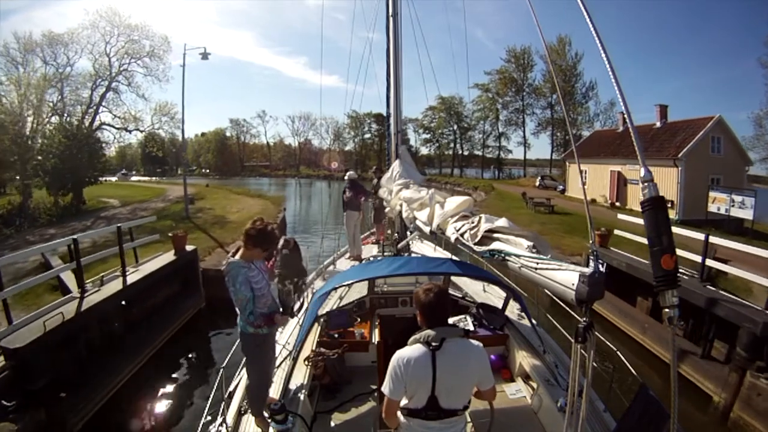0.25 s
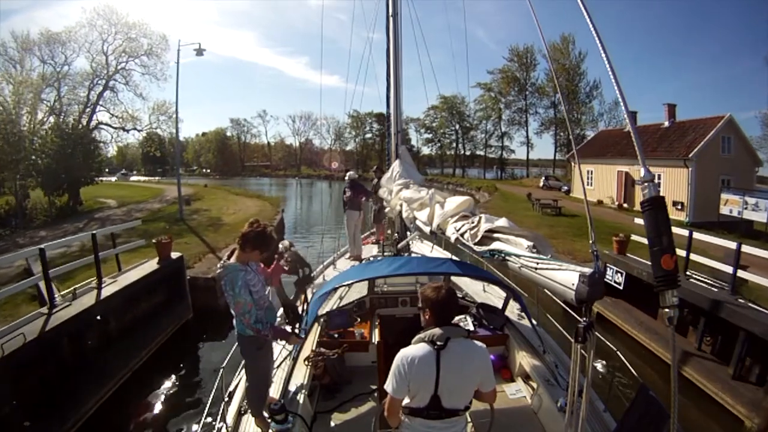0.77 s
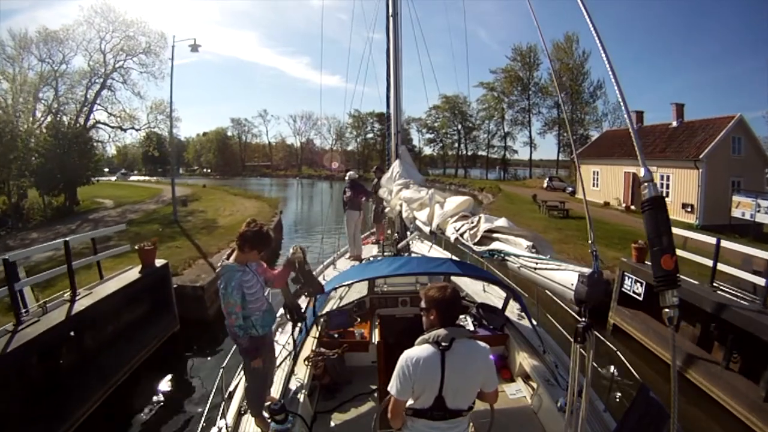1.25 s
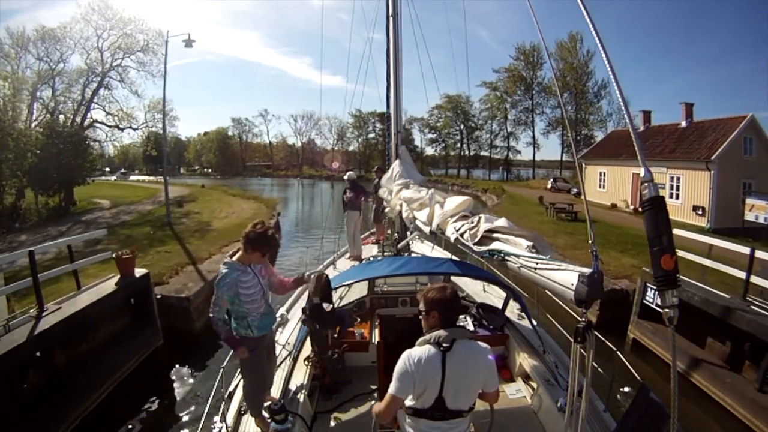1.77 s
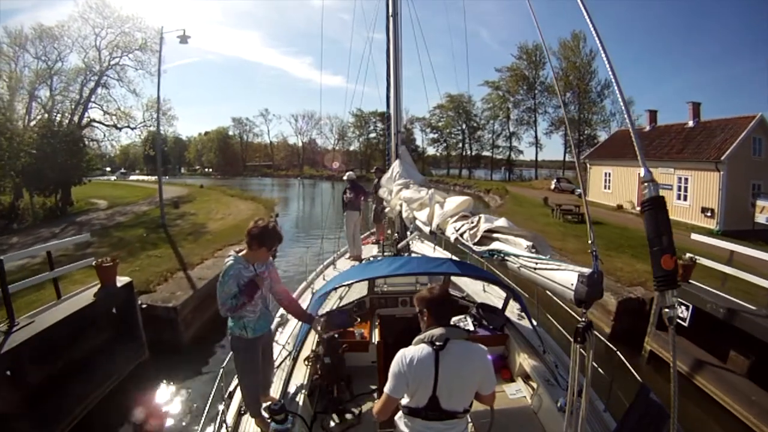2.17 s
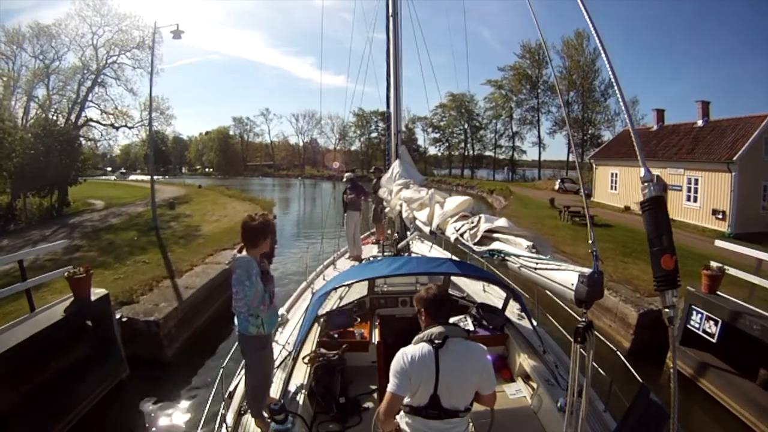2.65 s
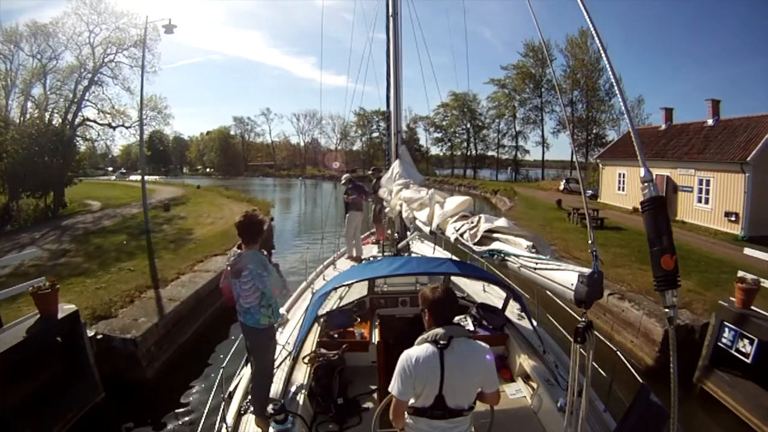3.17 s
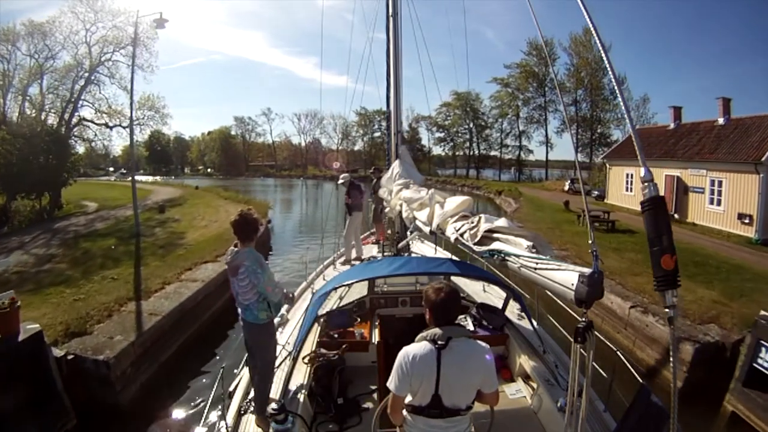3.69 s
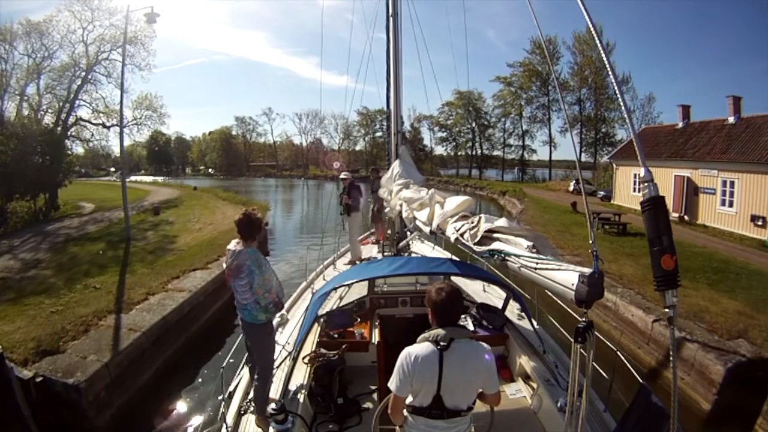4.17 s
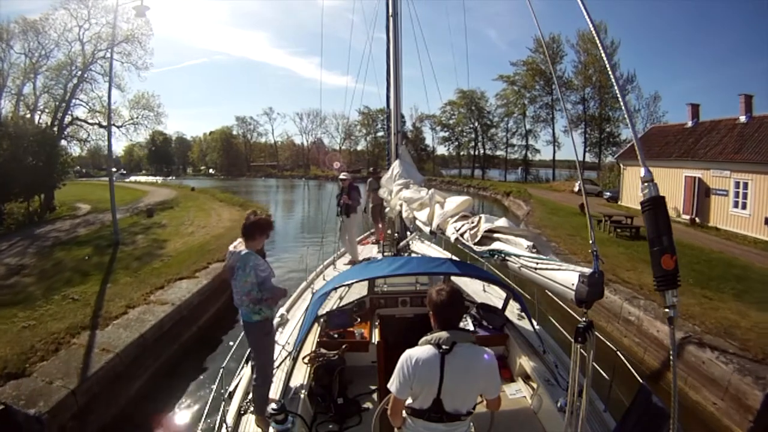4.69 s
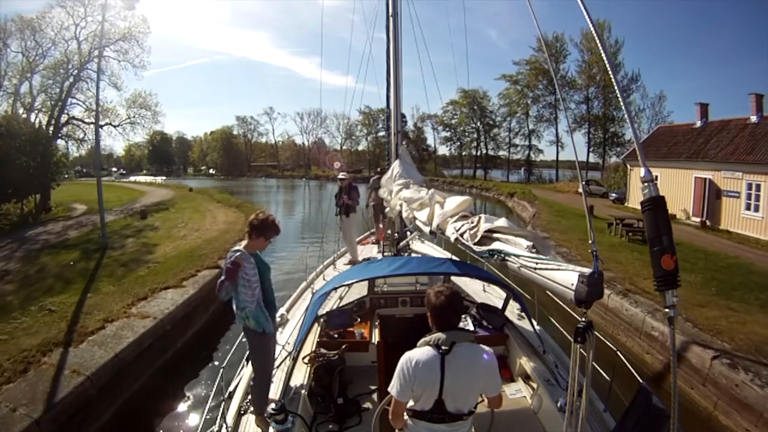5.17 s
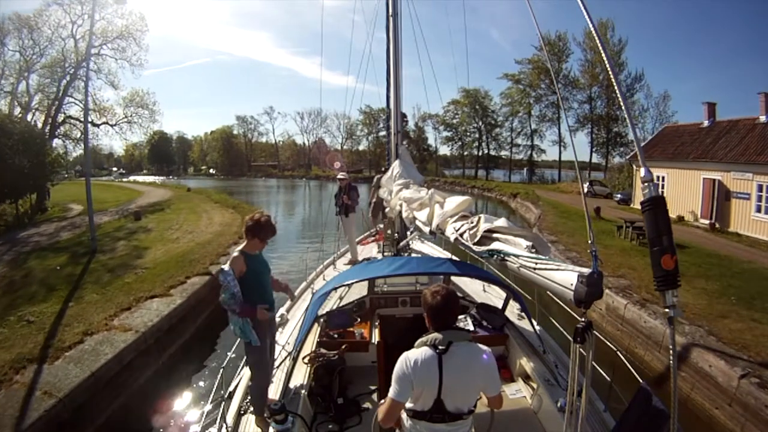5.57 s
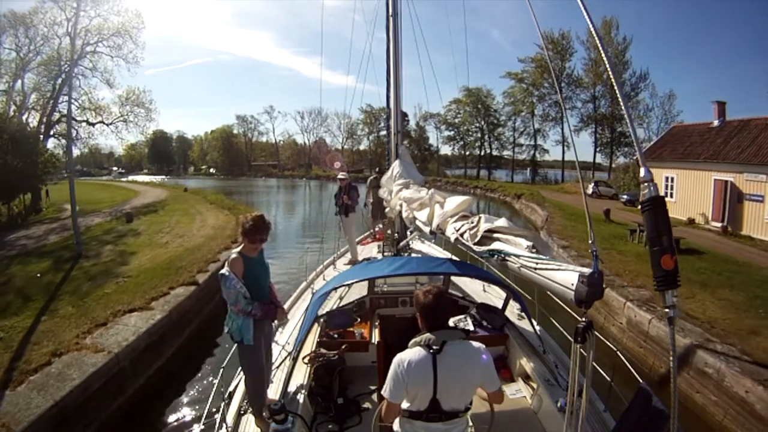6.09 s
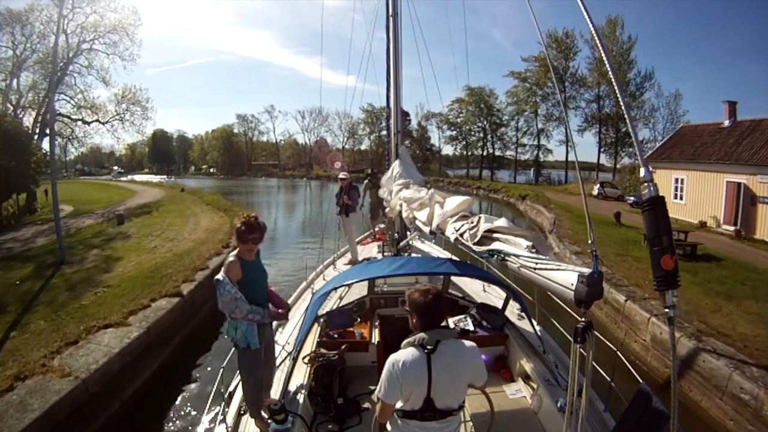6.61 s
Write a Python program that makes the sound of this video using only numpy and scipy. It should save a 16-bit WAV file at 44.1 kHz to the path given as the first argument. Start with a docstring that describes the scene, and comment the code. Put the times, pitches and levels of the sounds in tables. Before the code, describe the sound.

From 0 to about 7 seconds a four-cylinder boat diesel idles below deck: a deep, steady throb of about 36 beats a second, with rumble, muffled valve clatter and a hull hum that strengthens mid-way and eases near the end. Soft exhaust booms swell at 0.7, 2.5, 3.2, 4.3, 4.9, 5.6 and 6.2. Gulls call throughout, nasal mews breaking upward and sagging, among short lower yelps; they crowd together from 0.4 to 2.4 and again around 4.4 to 4.9, with a cracked yelp near 0.6. Deck gear clicks at 2.2 and 2.3, then thuds woodily at 2.45. Thin, distant peeps come at 2.9, 3.9, 5.2 and 6.3. Water washes gently around 3.6. Faint airy hiss and a thin echo of the birds suggest open banks; the microphone is coarse, adding a glassy treble to the calls.

```python
"""A sailing boat creeps out of a canal lock, heard from its stern: a four-cylinder diesel idles below deck.
From the start its firing tones, rumble and hull hum run on, and gulls overhead mew in held cries and short yelps;
the wet exhaust booms now and then, and gear knocks on deck just after two seconds. Then a small bird peeps far
off in thin sines, water washes once along the hull, and the gulls call on with a faint echo off the banks.
The microphone's signal is sampled and held at a low rate, which mirrors the calls into the treble."""
import sys
import numpy as np
from scipy import signal
from scipy.fft import rfft, irfft, next_fast_len
from scipy.io import wavfile
from scipy.ndimage import map_coordinates

SR = 44100
rng = np.random.default_rng(int(sys.argv[2]) if len(sys.argv) > 2 else 0)


def persist_wave(psi):
    """Save psi, clipped to +-1, as 16-bit WAV."""
    counts = np.round(np.clip(psi, -1, 1) * 32767).astype(np.int16)
    wavfile.write(sys.argv[1], SR, np.atleast_2d(counts).T)


N = 302085  # samples

# engine tones; quarter orders come from unequal cylinders: multiple_of_firing_rate, relative_level_db
FIRING_ORDERS = [(0.25, -36), (0.5, -12), (0.75, 3), (1, 0), (1.25, -18), (1.5, -17), (1.75, -39),
                 (2.001, -9), (2.25, -4.5), (2.5, -4), (2.75, -13), (3, 1), (3.25, 0.5), (3.5, -7.5),
                 (3.752, -12), (4, -3), (4.251, -16.5), (4.5, -4), (4.75, -10.5), (5, -9), (5.25, -17),
                 (5.5, -8.5), (5.75, -21), (6, -12.5), (6.252, -29), (6.499, -11), (6.749, -20), (7, -14)]
# how the engine parts come and go, before the trims in engine(): time_s, rumble_db, hull_hum_db, clatter_db
ENGINE_LEVELS = [(0, -36, -54.5, -45.5), (1, -38, -45.5, -50), (2, -40, -43.5, -46.5),
                 (3.2, -38.5, -40, -49.5), (4.6, -39.5, -40.5, -47.5), (5.4, -38.5, -40.5, -47.5),
                 (6.1, -38.5, -46.5, -48.5), (6.8, -38, -52, -48.5)]
# colour of the low engine noise: frequency_hz, density_db
RUMBLE_COLOUR = [(20, -35), (40, -18), (56, -22), (72, -2.5), (115, 4.5), (140, -5), (215, 0), (245, -14),
                 (285, -3), (330, -17.5), (420, -28)]
# colour of the valve and injector noise: frequency_hz, density_db
CLATTER_COLOUR = [(250, -9.5), (350, 6.5), (390, -2), (425, 1.5), (470, 1.5), (500, -3.5), (530, 0.5),
                  (560, -1), (620, 1.5), (665, -7.5), (730, -14), (900, -19), (1100, -34.5), (2000, -22)]
# panels of the hull that sing: frequency_hz, relative_level_db
HULL_PANELS = [(313.2, -12.5), (319, 1)]
# narrow resonances of the engine casing: frequency_hz, half_width_hz, relative_level_db
CASING_MODES = [(617.5, 10.5, 0.5), (845, 10.4, -14.5), (1012, 8, -16.5), (1212, 29, -17),
                (1731, 15.5, -15.5)]
# swells of the wet exhaust: centre_s, length_s, level_db
EXHAUST_BOOMS = [(0.683, 0.16, -42), (2.5, 0.46, -39), (3.174, 0.23, -34), (4.347, 0.46, -42.5),
                 (4.93, 0.25, -37.5), (5.59, 0.36, -42), (6.2, 0.14, -42)]
# a mew is a held cry in the high register, between a lead-in and a tail in the low one; the levels are those
# at the start of each part, before the throat: start_s, length_s, first_hz, hold_from_hz, hold_to_hz, last_hz,
# hold_end (share of the cry, 0-1), cry_db, lead_in_db, tail_s, tail_db
MEW_CALLS = [(-0.06, 0.14, 1537, 1559, 1526, 1341, 0.57, -51.5, -60, 0.08, -74),
             (0.431, 0.13, 1732, 1770, 1743, 1597, 0.63, -46, -51.5, 0.08, -69),
             (0.959, 0.23, 1631, 1768, 1703, 1383, 0.74, -45, -55, 0.079, -59),
             (1.356, 0.16, 1689, 1703, 1632, 1590, 0.9, -50, -59.5, 0.08, -72),
             (1.714, 0.28, 1562, 1738, 1692, 1384, 0.61, -48.5, -62, 0.072, -72),
             (1.937, 0.28, 1713, 1730, 1700, 1203, 0.52, -47, -59.5, 0.078, -59.5),
             (2.714, 0.26, 1463, 1653, 1593, 1628, 0.75, -54.5, -68, 0.08, -72),
             (2.92, 0.22, 1668, 1732, 1760, 1530, 0.72, -50.5, -68, 0.08, -72),
             (3.073, 0.21, 1436, 1386, 1558, 1287, 0.56, -44.5, -55, 0.1, -48),
             (3.869, 0.272, 1385, 1450, 1545, 1146, 0.56, -45, -49, 0.12, -48),
             (4.65, 0.19, 1475, 1607, 1591, 1221, 0.46, -51, -60, 0.11, -72),
             (4.998, 0.2, 1355, 1487, 1543, 1356, 0.67, -50.5, -63.5, 0.16, -47),
             (5.602, 0.26, 1378, 1627, 1597, 1257, 0.68, -50, -64.5, 0.073, -72),
             (5.926, 0.138, 1330, 1525, 1355, 1330, 0.7, -46, -61, 0.12, -51.5),
             (6.353, 0.21, 1712, 1709, 1685, 1570, 0.6, -56, -70, 0.089, -72),
             (6.627, 0.2, 1546, 1648, 1686, 1540, 0.6, -52, -69, 0.08, -72)]
# a yelp is one short bowed glide with no register break, its level that of the middle, before the throat:
# start_s, length_s, first_hz, middle_hz, last_hz, level_db, overtones_db
YELP_CALLS = [(0.224, 0.065, 1710, 1660, 1640, -63, -10), (0.443, 0.088, 1571.0, 1613, 1550.0, -52, -14),
              (0.551, 0.11, 1007, 1170, 1180, -44.5, -2), (0.646, 0.093, 1187.0, 1254, 1213, -48.5, -3),
              (0.76, 0.15, 1240, 1246.0, 1110, -58.5, 0), (1.46, 0.12, 1401.0, 1320, 1205.0, -56.5, -3),
              (1.537, 0.13, 1030, 1131.0, 971.0, -52.5, 2.5), (1.639, 0.088, 1270, 1250, 1140, -47.5, -5.5),
              (1.858, 0.032, 1368.0, 1462.0, 1519.0, -49.5, -2), (1.885, 0.1, 1245, 1297, 1265, -64, 12.5),
              (1.976, 0.076, 1394, 1365, 1320, -52, 2), (2.063, 0.09, 1118.0, 1054.0, 1030, -54, -1.5),
              (2.066, 0.073, 1325, 1247, 1095, -48.5, -10), (2.309, 0.12, 1033, 1116.0, 975, -51, 0.5),
              (2.427, 0.31, 1100, 1129, 1184, -57.5, -3), (2.91, 0.047, 1230, 1320, 1200, -57.5, -8),
              (2.924, 0.07, 1630, 1440, 1340, -57, -10), (3.775, 0.048, 1400, 1310, 1190, -56.5, -8),
              (4.33, 0.032, 1034, 1074, 1075, -56, -12), (4.404, 0.115, 1400, 1398, 1300, -48, -6),
              (4.466, 0.04, 1425, 1536.0, 1560, -54, 0), (4.515, 0.13, 1361.0, 1313.0, 1210, -58.5, 3),
              (4.537, 0.06, 1797, 1740, 1615, -53.5, -18), (4.583, 0.048, 1082, 1130, 1190, -57, 3),
              (4.678, 0.068, 1444, 1400, 1299.0, -51, -6), (4.84, 0.16, 1206, 1221.0, 982.0, -55.5, -4.5),
              (5.827, 0.042, 1323, 1405, 1440, -55.5, -6), (5.86, 0.12, 1224.0, 1262, 1004, -52, -5.5),
              (6.717, 0.099, 1150, 1114, 965.0, -60.5, -3)]
# moments when a gull's voice cracks and its pitch scatters: centre_s, length_s, relative_scatter
VOICE_CRACKS = [(0.561, 0.031, 0.04), (0.646, 0.035, 0.061), (0.691, 0.036, 0.035), (0.72, 0.3, 0.008),
                (1.379, 0.03, 0.026), (4.61, 0.059, 0.022)]
# the gulls' throat: frequency_hz, gain_db
THROAT_GAIN = [(1800, -16), (2100, -1), (2450, -3), (2800, 1.5), (3100, -1), (3500, -6), (3900, -9),
               (4250, -15.5), (4600, -19), (5000, -12.5), (5700, -28.5)]
# contacts of the deck gear: start_s, click_db, thud_relative_to_click_db
GEAR_KNOCKS = [(2.207, -62, -6), (2.306, -47.5, -6), (2.431, -47.5, 9), (2.461, -43, 20.5),
               (2.471, -58, 24.5)]
# ringing modes of the deck: frequency_hz, relative_level_db, t60_s
DECK_MODES = [(267, 3.5, 0.074), (328, 1, 0.19), (428, -1, .11), (530, 0.5, 0.12), (677, -14, 0.045)]
# colour of a click: frequency_hz, density_db
CLICK_COLOUR = [(300, 9), (700, 9.5), (1200, -7.5), (2200, -4.5), (3300, 0.5), (4000, -24), (4700, -8.5),
                (5900, -19)]
# a small far bird, timed where each peep is 3 dB below its peak: start_s, length_s, pitch_hz, level_db
BIRD_PEEPS = [(2.85, 0.043, 5600, -72), (3.94, 0.065, 5650, -66), (5.16, 0.039, 5530, -68),
              (6.314, 0.069, 5600, -68)]
# colour of the outdoor hiss: frequency_hz, density_db
AIR_COLOUR = [(500, -38), (1000, 0.5), (1500, 0), (1850, -13), (2080, 7), (2400, 3.5), (2900, 2.5),
              (3400, -4.5), (4200, -11), (5000, -10.5), (5900, -16)]
# colour of the wash along the hull: frequency_hz, density_db
SPRAY_COLOUR = [(1500, -12), (2200, -2), (3100, -2.5), (3900, -2), (4500, -9.5), (5900, -21)]

FIRING_HZ = 36.16
CRY_FADE_DB_PER_S = 31
SCOOP_S, FALL_POWER = 0.022, 1.4  # a cry scoops up to its hold, then falls ever faster
LEAD_S, LEAD_HZ, LEAD_RISE = 0.051, 1345, 0.13  # the lead-in climbs by this share, up to the break
TAIL_HZ, TAIL_SAG, TAIL_BEND = 1151, 0.19, 2.1  # the tail drops in here and sags by this share, ever faster
LEAD_SWELL_DB, TAIL_FADE_DB = 8.5, 7
# the low register follows the cry's first and last pitch, about their usual values, by this power
USUAL_FIRST_HZ, USUAL_LAST_HZ, LOW_FOLLOWS = 1495, 1335, 0.52
# fourth and fifth harmonics: their usual ceiling, their gain in the strongest crack
UPPER_LIMIT_DB, CRACK_FLARE_DB = -6, 10
# share by which the pitch wanders; random knots a second of that, and of a crack
WAVER, WAVER_RATE, CRACK_RATE = 0.003, 35, 190
HOLD_HZ, TOP_HZ = 12000, 15350  # sample-and-hold rate, band limit


def amp(db):
    """Decibels to gain."""
    return 10 ** (np.asarray(db) / 20)


def unit(x):
    """Scale to rms 1."""
    return x / np.sqrt(np.mean(x ** 2) + 1e-20)


def clock():
    """The time of every sample, in seconds."""
    return np.arange(N) / SR


def curves(rows, at):
    """Each column after the first, interpolated at these values of the first."""
    first, *columns = np.transpose(rows)
    return [np.interp(at, first, column) for column in columns]


def wobble(rate, size=N):
    """A smooth random curve, rate knots a second."""
    knots = rng.standard_normal(int(size * rate / SR) + 4)
    return map_coordinates(knots, [np.arange(size) * rate / SR], order=2, mode="nearest")


def filtered(x, response):
    """Weight the spectrum of x by a response of frequency."""
    m = next_fast_len(N + SR // 2)
    return irfft(rfft(x, m) * response(np.fft.rfftfreq(m, 1 / SR)), m)[:N]


def noise(colour):
    """Noise of rms 1 with this colour, cut off beyond its last point."""
    hz, db = np.transpose(colour)

    def response(f):
        return amp(np.interp(np.log(f + 1), np.log(hz), db, right=-120))
    return unit(filtered(rng.standard_normal(N), response))


def ringing(modes):
    """Noise of rms 1 in bell-shaped resonances."""
    def response(f):
        return sum(amp(db) / (1 + ((f - hz) / width) ** 2) for hz, width, db in modes)
    return unit(filtered(rng.standard_normal(N), response))


def swell(centre, length, t):
    """A smooth half-cosine bump at times t."""
    return np.cos(np.pi * np.clip((t - centre) / length, -0.5, 0.5))


def add(out, start, x):
    """Mix x into out from this time."""
    part = out[max(0, round(start * SR)):][:len(x)]
    part += x[:len(part)]


def engine(tones_db=-38.5, rumble_db=-3.5, hum_db=-1, clatter_db=2.0, casing_db=-60, throb=0.55):
    """Firing tones, with rumble and clatter that pulse with the pistons, and the hum of the hull."""
    rumble_level, hum_level, clatter_level = curves(ENGINE_LEVELS, clock())
    turn = 2 * np.pi * np.cumsum(FIRING_HZ * (1 + 0.0014 * wobble(1.987))) / SR  # one cycle per firing

    # exact whole orders are steadier; the others waver with the balance of the cylinders
    tones = np.zeros(N)
    for order, db in FIRING_ORDERS:
        waver_db = 1.3 if order % 1 else 0.5
        level = amp(db + waver_db * wobble(5.2))
        tones += level * np.sin(order * turn + rng.uniform(0, 2 * np.pi))

    rumble = amp(rumble_level + rumble_db) * unit(1 + throb * np.cos(turn)) * noise(RUMBLE_COLOUR)
    valves = 1 + 0.22 * np.cos(2 * turn)  # valves and injectors strike twice per firing
    clatter = amp(clatter_level + clatter_db) * valves * noise(CLATTER_COLOUR)

    singing = sum(amp(db) * np.sin(2 * np.pi * hz * clock() + 0.81 * wobble(4)) for hz, db in HULL_PANELS)
    shaking = 1 + 0.34 * np.cos(turn / 2 + wobble(2.96))  # by every other firing
    hull = unit(shaking * singing + 0.35 * ringing([(325, 34, 0)]))
    hum = amp(hum_level + hum_db) * hull
    casing = amp(casing_db) * ringing(CASING_MODES)
    return amp(tones_db) * unit(tones) + rumble + clatter + hum + casing


def exhaust(pipe_hz=73):
    """The wet exhaust booms briefly near the second firing harmonic, as a sine of wandering phase."""
    level = sum(amp(db) * swell(centre, length, clock()) for centre, length, db in EXHAUST_BOOMS)
    return level * unit(np.sin(2 * np.pi * pipe_hz * clock() + 0.79 * wobble(12)))


def mews(cry_overtones_db=-15, lead_overtones_db=-5, tail_overtones_db=-11):
    """The voice climbs, breaks up into a cry that it holds and lets fall, then breaks down into a sagging tail."""
    out, u = np.zeros(N), np.linspace(0, 1, 64)  # u: share of each part gone by
    for (start, length, first, hold_from, hold_to, last, hold_end,
         cry_db, lead_db, tail_s, tail_db) in MEW_CALLS:
        hold_end = np.clip(hold_end, 0.05, 0.95)
        hold = np.interp(u, [0, hold_end], [hold_from, hold_to])
        scoop = (hold_from - first) * np.exp(-u * length / SCOOP_S)
        fall = (hold_to - last) * np.maximum((u - hold_end) / (1 - hold_end), 0) ** FALL_POWER
        cry = hold - scoop - fall
        lead = LEAD_HZ * (first / USUAL_FIRST_HZ) ** LOW_FOLLOWS * (1 - LEAD_RISE * (1 - u))
        tail = TAIL_HZ * (last / USUAL_LAST_HZ) ** LOW_FOLLOWS * (1 - TAIL_SAG * u ** TAIL_BEND)

        lead_level = lead_db + LEAD_SWELL_DB * u
        cry_level = cry_db - CRY_FADE_DB_PER_S * length * u
        tail_level = tail_db - TAIL_FADE_DB * u ** 2
        if start > 0:  # a cry already under way has no lead-in
            add(out, *gull_note(start - LEAD_S, LEAD_S, lead, lead_level, lead_overtones_db))
        add(out, *gull_note(start, length, cry, cry_level, cry_overtones_db))
        add(out, *gull_note(start + length, tail_s, tail, tail_level, tail_overtones_db))
    return out


def yelps(ends_db=-4):
    """Between and across the cries come short bowed glides, their level contour highest in the middle."""
    out, u = np.zeros(N), np.linspace(0, 1, 64)
    bow = 4 * u * (1 - u)  # 0 at the ends, 1 in the middle
    for start, length, first, middle, last, db, overtones_db in YELP_CALLS:
        pitch = first + (last - first) * u + (middle - (first + last) / 2) * bow
        add(out, *gull_note(start, length, pitch, db + ends_db * (1 - bow), overtones_db))
    return out


def gull_note(start, length, pitch, level_db, overtones_db, jitter=0.0028, shimmer_db=2.0, edge_s=0.005,
              fourth_db=-1, fifth_db=-4):
    """Harmonics 2 to 5 through the throat, which hides the fundamental; the pitch scatters in a voice crack.
    Pitch and level are contours spread evenly over the note; returns the start time and the sound."""
    t = np.arange(max(start - edge_s / 2, 0), start + length + edge_s / 2, 1 / SR)
    size = len(t)
    contour = np.column_stack([np.linspace(start, start + length, len(pitch)), pitch, level_db])
    pitch, level_db = curves(contour, t)

    scatter = sum(depth * swell(centre, span, t) for centre, span, depth in VOICE_CRACKS)
    wander = jitter * wobble(460, size) + WAVER * wobble(WAVER_RATE, size)
    pitch = pitch * (1 + wander + scatter * wobble(CRACK_RATE, size))
    phase = 2 * np.pi * np.cumsum(pitch) / SR

    # the highest harmonics stay weak, except that they flare up where the voice cracks
    deepest = max(depth for centre, span, depth in VOICE_CRACKS)
    upper_db = min(overtones_db, UPPER_LIMIT_DB) + CRACK_FLARE_DB * np.sqrt(scatter / deepest)
    harmonics_db = [0, overtones_db, upper_db + fourth_db, upper_db + fifth_db]
    voice = np.zeros(size)
    for k, db in enumerate(harmonics_db, 2):
        throat_db = curves(THROAT_GAIN, k * pitch)[0]
        voice += amp(level_db + db + throat_db + shimmer_db * wobble(89.0, size)) * np.sin(k * phase)
    gate = np.clip(np.minimum(t - t[0], t[-1] - t) / edge_s, 0, 1)
    return t[0], np.sqrt(2) * gate * voice


def deck_gear(click_t60_s=0.12, attack_s=0.0017):
    """Each contact makes a click of decaying noise and a thud of decaying deck modes."""
    thuds, clicks, t = np.zeros(N), np.zeros(N), np.arange(SR // 4) / SR
    rise = 1 - np.exp(-t / attack_s)
    modes = sum(amp(db - 60 * t / t60) * np.sin(2 * np.pi * hz * t) for hz, db, t60 in DECK_MODES)
    ring = rise * modes
    for start, click_db, thud_db in GEAR_KNOCKS:
        add(thuds, start, amp(click_db + thud_db) * ring / np.abs(ring).max())
        add(clicks, start, 2 * rise * amp(click_db - 60 * t / click_t60_s))
    return thuds + clicks * noise(CLICK_COLOUR)


def small_bird():
    """Thin far-off peeps: sines made slightly buzzy by fast random phase."""
    out = np.zeros(N)
    for start, length, hz, db in BIRD_PEEPS:
        peep = np.sin(2 * np.pi * hz * clock() + 1.4 * wobble(180))
        out += amp(db) * swell(start + length / 2, 2 * length, clock()) * peep
    return out


def water(air_db=-61, spray_db=-60):
    """An outdoor hiss of gently wavering noise, and one soft wash of water along the hull."""
    air = amp(air_db + 0.77 * wobble(2.33) + 0.12 * wobble(25)) * noise(AIR_COLOUR)
    wash = amp(spray_db) * swell(3.64, 0.76, clock()) * noise(SPRAY_COLOUR)
    return air + wash


def banks(x, t60_s=0.51, build_s=0.027):
    """The banks and trees return a thin diffuse echo: a decaying noise tail that builds up softly."""
    t = np.arange(SR // 2) / SR
    tail = rng.standard_normal(len(t)) * amp(-60 * t / t60_s) * (1 - np.exp(-t / build_s))
    return signal.fftconvolve(x, tail / np.linalg.norm(tail))[:N]


def scene(echo_db=-14.5):
    """Boat, birds and water at the stern; only the birds are echoed."""
    birds = mews() + yelps() + small_bird()
    boat = engine() + exhaust() + deck_gear()
    return (boat + birds + water() + amp(echo_db) * banks(birds))[None]


def record(dry, low_cut_hz=32, high_cut_hz=5600):
    """Steep band cuts; holding samples mirrors the band about the hold rate; nothing stays above the limit."""
    def before_hold(hz):
        low_cut = 1 + (low_cut_hz / (hz + 1)) ** 20
        high_cut = 1 + (hz / high_cut_hz) ** 30
        droop = np.sinc(np.minimum(hz / HOLD_HZ, 0.5))  # made up for ahead of the hold
        return (hz < HOLD_HZ / 2) / np.sqrt(low_cut * high_cut) / droop

    def hold(hz):
        # each sample is repeated as four steps
        return np.sinc(hz / HOLD_HZ) / np.sinc(hz / (4 * HOLD_HZ)) * (hz < TOP_HZ)

    band = filtered(dry[0], before_hold)
    mirrored = band * (1 + 2 * np.cos(2 * np.pi * HOLD_HZ * clock()))
    return filtered(mirrored, hold)[None]


dry = scene()
out = record(dry)
persist_wave(out)
```